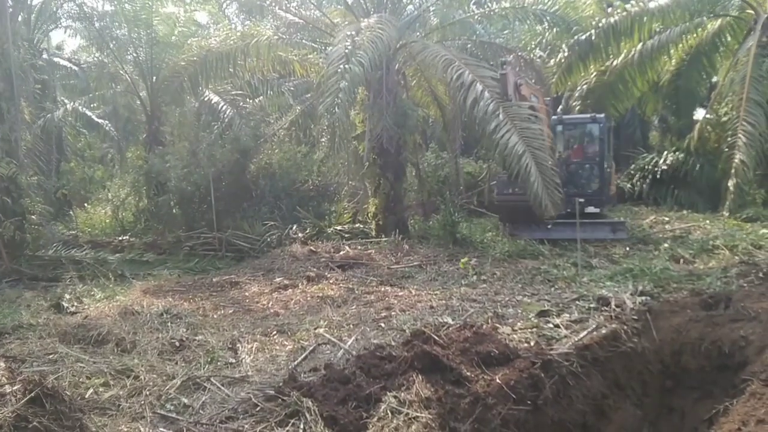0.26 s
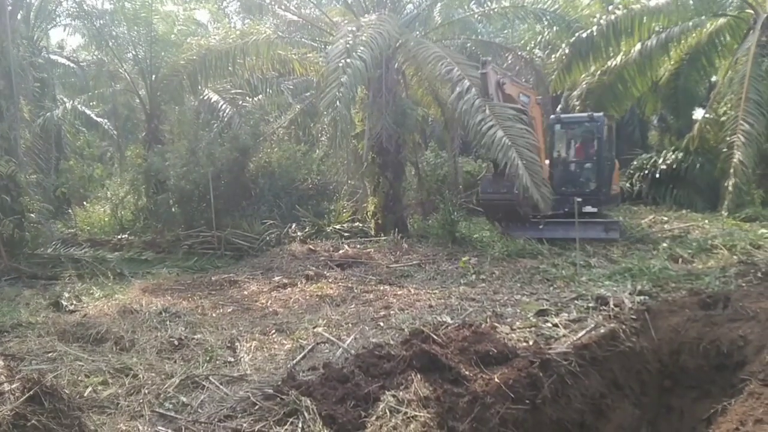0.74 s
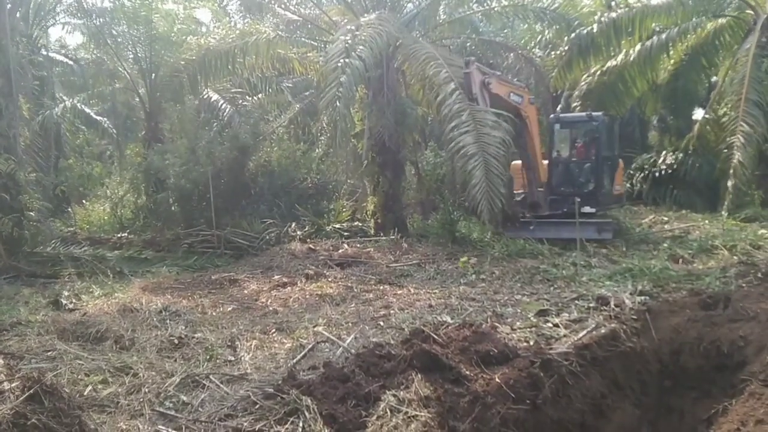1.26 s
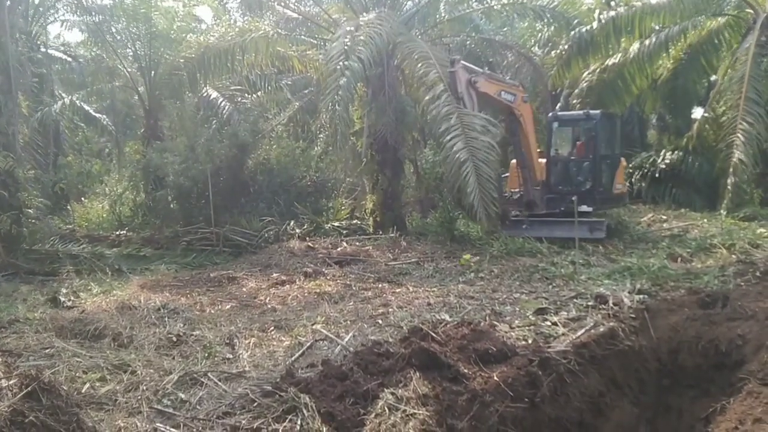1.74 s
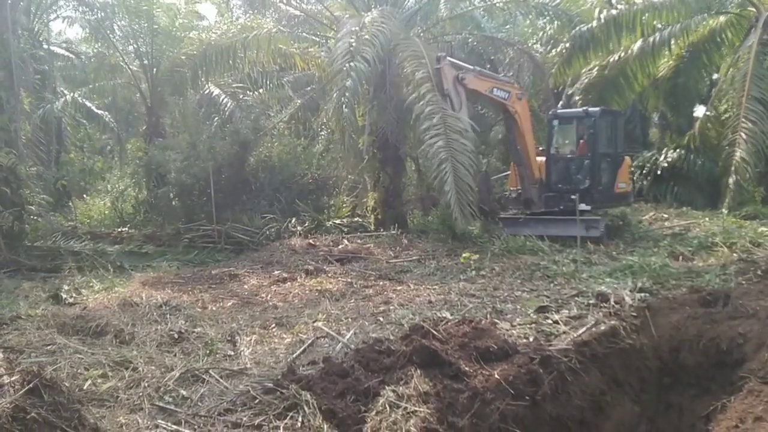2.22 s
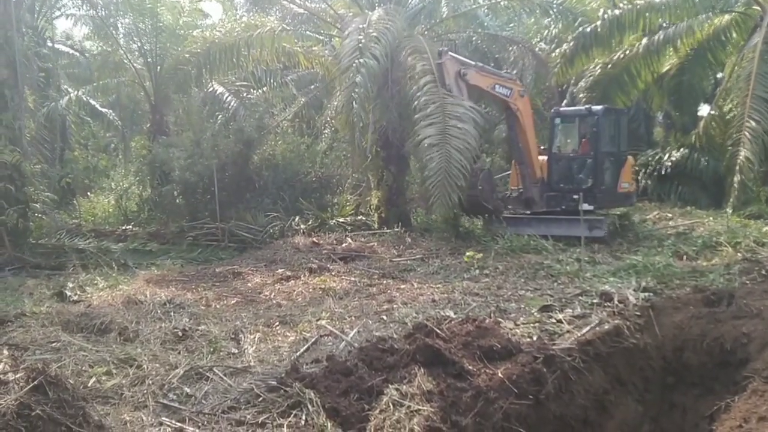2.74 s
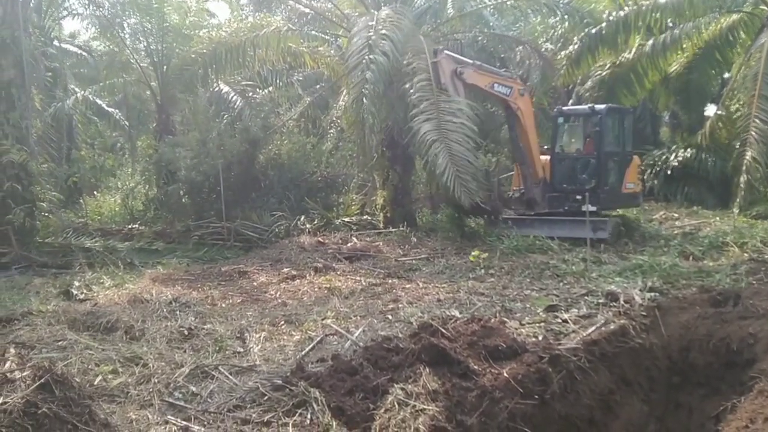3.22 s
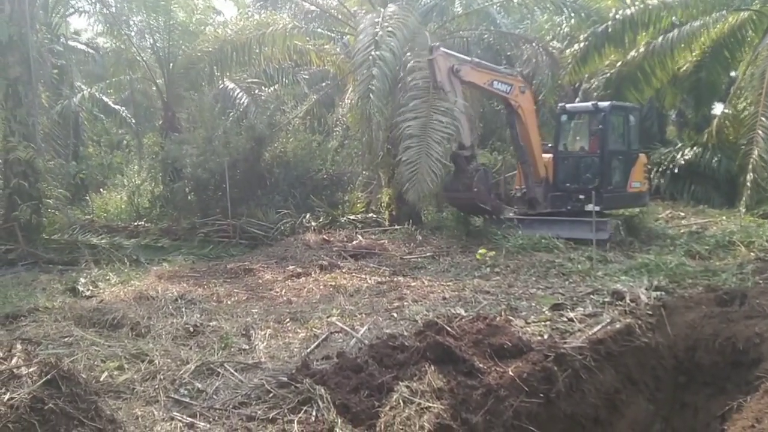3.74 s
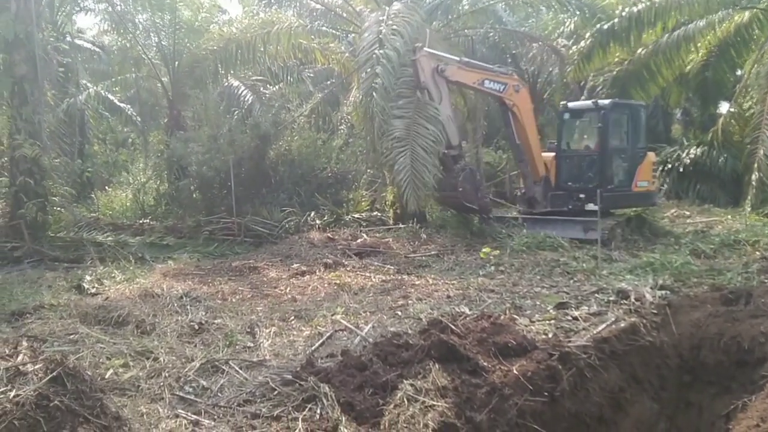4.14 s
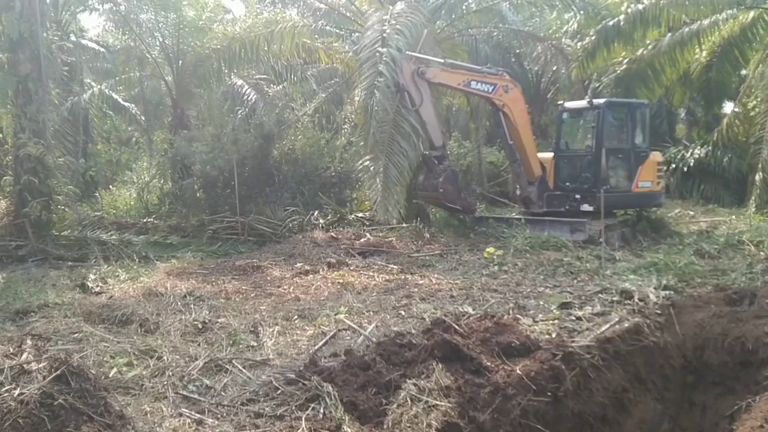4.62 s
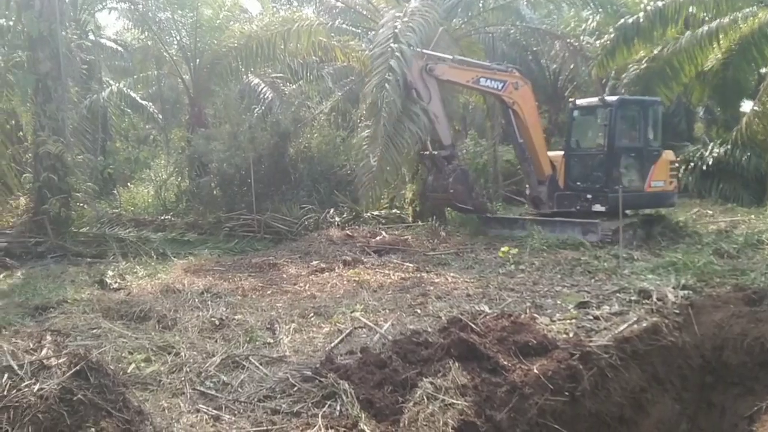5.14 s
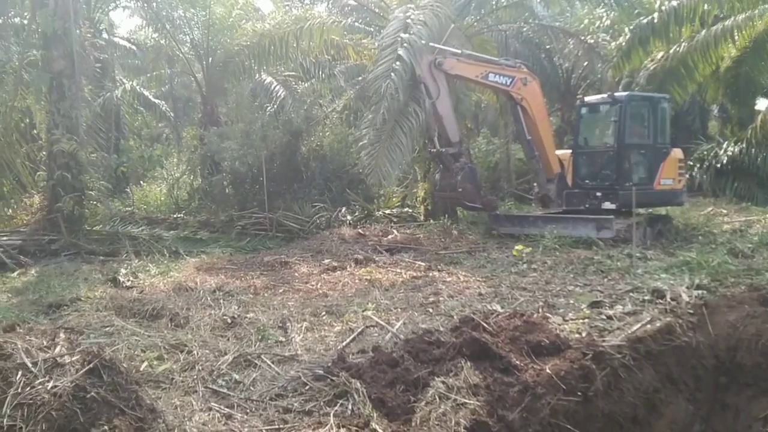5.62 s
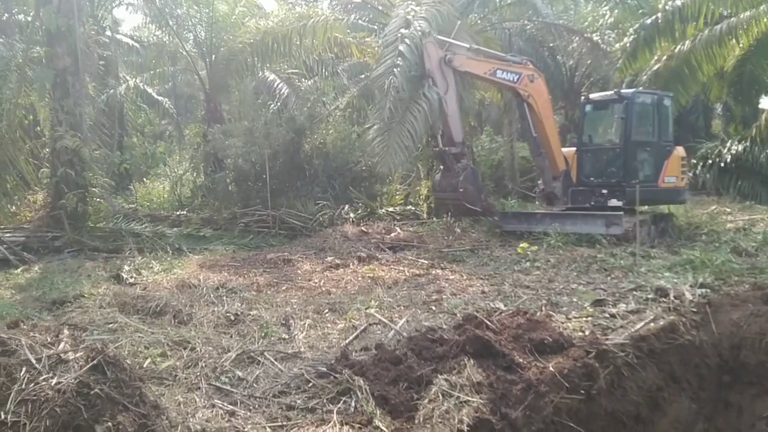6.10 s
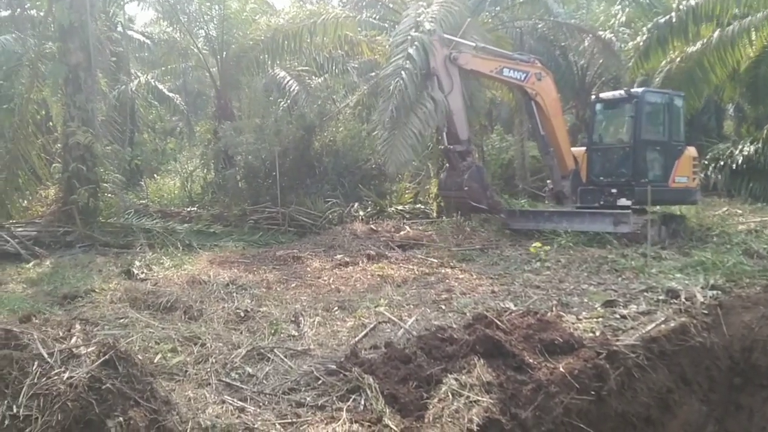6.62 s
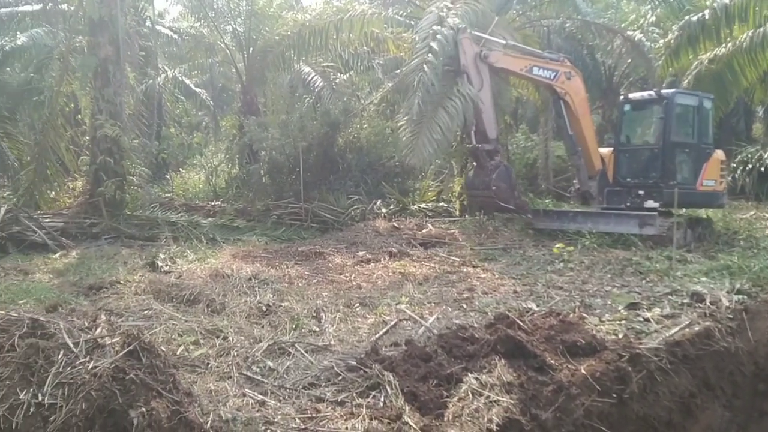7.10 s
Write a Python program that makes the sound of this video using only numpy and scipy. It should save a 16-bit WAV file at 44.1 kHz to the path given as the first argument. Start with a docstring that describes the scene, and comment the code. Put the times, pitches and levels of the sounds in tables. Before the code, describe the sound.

A small diesel excavator hums faintly at a distance outdoors, its steel knocking irregularly, dry fronds snapping, then a burst of hard clanks and grinding soil.

```python
"""Small excavator in a palm grove

A small diesel excavator works some way off. Its exhaust is a hum of sine orders of the firing rate; its
whirr and hiss are noise flickering in fixed resonances. Noise and sharp pushes ring steel, as the tracks or the
bucket knock and the bucket grinds through soil, and ring dry fronds as they snap. Leaves rustle as band noise,
gliding sines squeak and thump near the end, and a low rumble and faint wide noise fill the air. A noise
suppressor and a low-pass follow.
"""
import sys
import numpy as np
from scipy import signal
from scipy.fft import rfft, irfft
from scipy.io import wavfile
from scipy.ndimage import uniform_filter1d

SR = 44100
rng = np.random.default_rng(int(sys.argv[2]) if len(sys.argv) > 2 else 0)


def unload_wav(signal):
    """Save mono or channel-first audio to the path in sys.argv[1] as 16-bit WAV at rate SR, clipped to [-1, 1]."""
    wavfile.write(
        sys.argv[1],
        SR,
        np.round(np.clip(np.atleast_2d(signal).T, -1, 1) * 32767).astype(np.int16),
    )


N = 324576

# Exhaust level over time: time_s, firing_tone_db, octave_db
EXHAUST = [(0.0, -61, -74), (1.52, -60, -69), (3.2, -60.5, -70), (5.06, -57.5, -59.5), (6.39, -59.5, -65),
           (6.5, -70, -75), (7.03, -65, -94), (7.32, -62, -69), (7.36, -64, -91)]
# Firing rate over time: time_s, firing_rate_hz
FIRING_RATE = [(0, 64), (1.4, 63.8), (1.9, 64.1), (2.3, 64.7), (3.2, 65.2), (3.7, 64.2), (4.6, 64.7),
               (6.3, 64.7), (6.6, 67.5), (7, 67.5), (7.36, 65.5)]
# Further exhaust orders: multiple_of_firing_rate, level_db (re firing tone)
EXHAUST_ORDERS = [(0.496, -17), (1.502, -33), (2.502, -15.5), (4.251, -6.5), (4.5, -7.5)]

# Knocks of steel, of the tracks or the bucket, nominal drive levels:
# start_s, boom_db, clang_db, rasp_db, ring_db, t60_s
KNOCKS = [(0.008, -49.5, -46.5, -57, -65, 0.35), (0.46, -63, -49, -60, -51, 0.25),
          (0.532, -32.5, -77, -75, -78, 0.052), (1.789, -42, -80, -78, -90, 0.16),
          (2.02, -60, -39, -65, -72, 0.3), (2.05, -32, -39, -42, -48, 0.15),
          (2.078, -33.5, -35, -36.5, -48.5, 0.23), (2.111, -31, -41.5, -46, -49.5, 0.24),
          (2.18, -37, -35, -42, -41, 0.13), (2.191, -34, -42, -42.5, -46, 0.48),
          (2.413, -31, -38, -46.5, -49, 0.15), (2.466, -41.5, -43, -48, -73, 0.38),
          (2.535, -61, -69, -46, -47, 0.12), (2.564, -61, -68, -51, -46.5, 0.19),
          (2.707, -40, -64, -53, -71, 0.45), (2.746, -40.5, -49.5, -54, -75, 0.25),
          (2.767, -63, -52, -41, -60, 0.2), (2.853, -63, -43, -53, -49, 0.41),
          (2.948, -34, -43, -51.5, -50, 0.35), (3.217, -38.5, -43, -61, -74, 0.15),
          (3.432, -41.5, -48, -49, -48.5, 0.58), (3.591, -33.5, -60, -50.5, -53.5, 0.38),
          (3.692, -45.5, -37, -44, -57, 0.13), (3.775, -36.5, -38.5, -68, -68, 0.14),
          (3.914, -38.5, -65, -51, -50, 0.44), (4.168, -35, -46, -49, -49.5, 0.31),
          (4.462, -41, -57, -54.5, -69, 0.61), (4.599, -33, -57, -49, -68, 0.083),
          (4.704, -38.5, -54, -78, -75, 0.45), (4.793, -38, -48, -51, -52, 0.33),
          (4.951, -34.5, -78, -62, -69, 0.3), (5.022, -42.5, -47, -59, -71, 0.69),
          (5.079, -66, -60, -51.5, -46, 0.19), (5.202, -38.5, -55, -62, -62, 0.84),
          (5.306, -41, -44, -59, -56, 0.68), (5.379, -27.5, -43, -63, -64, 0.093),
          (5.429, -47, -44, -33, -38.5, 0.18), (5.512, -28.5, -24, -34, -38, 0.29),
          (5.633, -30.5, -48, -60, -66, 0.3), (5.744, -36, -31, -35, -48, 0.35),
          (5.762, -45, -26, -36, -36.5, 0.18), (5.78, -23.5, -51, -44, -52, 0.071),
          (5.81, -44, -51, -48, -36, 0.13), (5.88, -27.5, -22.5, -32, -40, 0.27),
          (5.899, -49, -29, -30.5, -34, 0.24), (5.973, -29, -33, -50, -48, 0.22),
          (6.002, -37, -28, -33.5, -33.5, 0.071), (6.042, -38, -39, -51, -46.5, 0.3),
          (6.14, -26, -27.5, -46, -47, 0.15), (6.172, -27.5, -33, -44, -60, 0.11),
          (6.227, -30.5, -71, -70, -72, 0.22), (6.261, -45, -37, -48, -50.5, 0.13),
          (6.381, -74, -35, -40, -45, 0.26), (6.459, -38, -49, -43, -70, 0.21),
          (6.496, -27.5, -35, -48, -68, 0.4), (6.547, -32.5, -38.5, -48, -48.5, 0.11),
          (6.745, -34, -40, -59, -68, 0.21), (6.855, -39, -58, -59, -65, 0.14),
          (7.09, -35.5, -64, -60, -72, 0.13)]
# Bucket dragged through soil, nominal drive levels: time_s, boom_db, clang_db, rasp_db, ring_db, scrape_db
GRIND = [(5.3, -34.5, -48, -53, -57, -66), (5.612, -40, -41, -59, -50, -83),
         (5.73, -41, -44.5, -52, -83, -74), (5.77, -40, -39, -43, -45, -50),
         (5.87, -36.5, -32.5, -38.5, -42, -46.5), (5.966, -39, -36, -39, -41.5, -44.5),
         (6.07, -38, -40.5, -43.5, -46.5, -57), (6.166, -48.5, -44.5, -55.5, -53, -75),
         (6.416, -45, -48, -54, -56, -80), (6.676, -45, -54.5, -60.5, -77, -81),
         (6.866, -51.5, -55.5, -78, -84, -77), (6.96, -61, -66, -70, -78, -80),
         (7.1, -46, -63, -72, -80, -80)]
# Resonances of the steel: pitch_hz, width_hz, level_db
STEEL_MODES = [(279, 40.4, -20), (349.98, 30, -4.5), (431.3, 67, 4), (398.6, 40, 17.5), (448.6, 59, 13),
               (810, 355, -13), (857, 267, -1), (843.5, 89, 1.5), (1018, 48, 0.5), (1115, 26, -4.5),
               (1238, 38, -13.5), (1320, 8.2, 3), (1301, 203, -4), (1693, 46, -1), (1750, 31, -4),
               (2033, 166, 4.5), (2150, 8.2, 6.5), (2290, 160, -9.5), (2736, 333, -4), (2944, 234, -0.5),
               (3356, 87, -9), (3600, 610, -17.5), (3970, 140, -18.5), (4910, 600, -12.5),
               (6540, 1550, -22)]
# Borders between the steel's bands (deep, boom, clang, rasp, ring, scrape, crack): border_hz
STEEL_EDGES = [350, 600, 1550, 2450, 3200, 4500]
# Single sharp push that starts a knock, for boom, clang, rasp and ring: level_db (re peak of the knock)
STRIKE_DB = [24, 17, 13, 13]

# Resonances of the machine: pitch_hz, width_hz, level_db
MACHINE_MODES = [(805, 83, 4.5), (1120, 40, -11), (1291, 64, 6.5), (1468, 18, 1.5), (1898, 58, -10.5),
                 (2016, 35, -2), (2190, 60, -5.5), (2331, 54, -3), (2715, 64, -9.5), (2809, 35, -8),
                 (2910, 48, -10.5), (3563, 65, -8.5), (4058, 69, -6), (4620, 1050, -8), (5000, 590, -7.5),
                 (5834, 620, -7), (6440, 660, -1.5), (6900, 350, -3.5), (7490, 700, -2), (8280, 550, -9.5)]
# Borders between the machine's bands (drone, buzz, whirr, whine, lower hiss, upper hiss): border_hz
MACHINE_EDGES = [950, 1600, 2450, 3200, 5450]
# Low drone: time_s, level_db
DRONE = [(0.0, -71), (0.33, -70), (0.7, -60), (1.95, -54), (2.97, -60), (4.45, -52), (5.23, -55),
         (5.86, -49.5), (7.09, -57.5), (7.36, -59.5)]
# Whirr and whine, one list before and one after the dig: time_s, whirr_db, whine_db
WHIRR = [
    [(0.0, -60, -59), (0.48, -61.5, -61), (0.77, -53.5, -55), (1.21, -63.5, -57.5), (1.41, -55.5, -55.5),
     (1.83, -66, -62.5), (2.26, -60.5, -58.5), (3.11, -60, -63.5), (3.95, -68, -52.5), (4.29, -57.5, -58.5),
     (4.93, -74, -59.5), (5.35, -54.5, -65)],
    [(6.2, -51.5, -59), (6.498, -72, -67.5), (6.66, -75, -57.5), (6.72, -76, -86), (6.934, -71, -67),
     (7.134, -80, -93), (7.22, -62, -80), (7.24, -62, -56), (7.36, -66, -78)],
]
# Hiss: time_s, upper_hiss_db, lower_hiss_db
HISS = [(0.1, -49.5, -53), (0.22, -52, -55.5), (1.15, -51, -54), (2.02, -51.5, -56), (2.06, -55.5, -59),
        (2.46, -49, -53), (3.38, -52.5, -56), (3.88, -50, -53.5), (4.69, -51, -56.5), (5.15, -50, -54),
        (5.72, -53.5, -55), (5.96, -48, -52.5), (6.15, -56, -55), (6.27, -55, -55), (6.45, -56, -58.5),
        (6.49, -56.5, -54.5), (6.62, -53, -57.5), (6.72, -59.5, -59.5), (6.77, -71, -68), (6.865, -72, -74),
        (6.88, -72, -54), (6.95, -63, -64), (7.14, -67, -64), (7.15, -55, -56.5), (7.21, -56.5, -58),
        (7.29, -53.5, -57), (7.31, -52.5, -54), (7.36, -51.5, -56)]
# Narrow gaps in the steady noise: pitch_hz, width_hz, depth_db
GAPS = [(610, 60, -8), (2490, 80, -4), (3170, 110, -5), (5390, 130, -8), (6150, 150, -5), (9250, 200, -4)]

# Dry fronds snapping, drive levels: start_s, peak_db, upper_resonances_db (re lower)
SNAPS = [(1.099, -39.5, -39), (2.901, -38.5, -3), (3.071, -66.5, 23.5), (3.1373, -56.5, 14),
         (3.177, -60, 19.5), (3.491, -34, 0), (3.6883, -43, -5), (3.7243, -35.5, -3), (3.8408, -43, 5),
         (3.845, -37, -1), (3.877, -41, 0), (3.892, -41, -4), (3.918, -44, -9), (3.931, -29.5, -2),
         (3.967, -39, 0), (3.973, -39, -10), (3.98, -42.5, 6), (3.99, -38.5, 3.5), (4.004, -46, 2),
         (4.13, -38, -14), (4.522, -46.5, 9.5), (4.7114, -42, 5), (6.48, -60.5, 16), (7.23, -48, -15)]
# Resonances of a frond, the first three being the lower ones: pitch_hz, width_hz, level_db
FROND_MODES = [(2795, 270, 4.5), (3702, 330, 7), (5270, 710, -8), (6850, 930, 2), (8900, 2600, -14)]
# Fronds brushed by the arm: time_s, level_db
RUSTLE = [(2.31, -78), (2.35, -58.5), (2.6, -75), (2.92, -58), (3.02, -77)]
# Short gliding tones near the end, squeaks and low thumps: start_s, length_s, from_hz, to_hz, level_db
GLIDES = [(6.956, 0.016, 1107, 1020, -49), (6.985, 0.036, 870, 785, -53.5), (7.088, 0.026, 573, 490, -47.5),
          (7.095, 0.045, 773, 1047, -48.5), (7.096, 0.036, 2130, 2110, -59),
          (7.114, 0.035, 285, 265, -51.5), (7.176, 0.03, 282, 265, -52), (7.152, 0.14, 1230, 1310, -57),
          (7.328, 0.056, 2300, 2070, -54)]
# Spectrum of the air noise: pitch_hz, density_db (per Hz, relative)
AIR_SPECTRUM = [(20, -36), (45, -26.5), (110, -12), (170, -18.5), (230, -19), (330, -9.5), (600, -6.5),
                (1500, -14), (3200, -15), (4100, -20.5), (4500, -26), (9000, -52), (10000, -58),
                (15600, -46)]

BUZZ_DB = -5.5  # re drone
SCRAPE_DB, CRACK_DB = -12, -9  # re the ring column of a knock
TICK_DB, TICK_S = -3, 0.008  # first contact of a knock, re clang and higher bands; its decay constant
SHOVE_S, SOFTER = 0.36, 0.13  # knocks with a longer t60 start more slowly; added share of rise at twice that t60
SPOT_DB, SPOTS_PER_S = 2.2, 5  # the place that is struck keeps moving, so each plate rings more or less
RUMBLE_DB = 1.5  # the low plates rattle in lumps while they ring
NARROW_HZ = 150  # narrow machine resonances waver in speed by a share and break into short grains:
WAVER, WAVERS_PER_S = .009, 9
CHIRP_DB, CHIRPS_PER_S = 3, 24
SIZZLE_HZ, SIZZLE_WIDTH_HZ, SIZZLE_DB = 7200, 170, -66  # a thin hiss that never stops
SNAP_RISE_S, SNAP_T60_S = .0005, .022
CLICK_DB = 12  # the single break that starts a snap, re its crackle
GLIDE_ROUGH = 0.02  # share by which the pitch trembles
AIR_DB = -52  # mean level below FIZZ_HZ
FIZZ_HZ, FIZZ_FOLLOWS = 8800, .4  # air above this pitch follows this share of the upper hiss's changes
EDGE_HZ = 15550  # upper band limit


def amp(db):
    """Decibel law: 20 dB is a factor of ten in amplitude."""
    return 10 ** (np.asarray(db) / 20)


def evened(x):
    """Power normalization: scales to rms 1."""
    return x / np.sqrt(np.mean(x ** 2) + 1e-20)


def curves(rows):
    """Linear interpolation: each column after the time becomes one value a sample."""
    time_s, *columns = np.transpose(rows)
    return np.array([np.interp(np.arange(N) / SR, time_s, c) for c in columns])


def flicker(per_s):
    """Band-limited random modulation: rms 1, wavering about per_s times a second."""
    steps = rng.standard_normal(N // 256 + 1)  # one step every 256 samples
    band = np.clip(np.array([.3, 1]) * per_s * 512 / SR, .001, .9)
    b, a = signal.butter(1, band, "bandpass")
    steps = evened(signal.filtfilt(b, a, steps))
    return np.interp(np.arange(N) / 256, np.arange(len(steps)), steps)


def ring(x, modes):
    """Damped resonance: convolves with steep modes (each applied twice); white noise keeps its level."""
    longest_s = 3 / min(width for _, width, _ in modes)
    t = np.arange(min(3072, int(longest_s * SR))) / SR
    response = 0
    for k, (hz, width, db) in enumerate(modes):
        decay = width ** 2 * t * np.exp(-4.9 * width * t)
        response = response + (-1) ** k * amp(db) * decay * np.sin(2 * np.pi * hz * t)
    return signal.oaconvolve(x, response / np.linalg.norm(response))[:N]


def grouped(modes, edges_hz):
    """Band division: splits a table of resonances at the given frequencies."""
    return [[m for m in modes if np.searchsorted(edges_hz, m[0]) == k] for k in range(len(edges_hz) + 1)]


def engine():
    """Harmonic synthesis: exhaust pulses reach this far as a few clean orders of the firing rate."""
    firing_db, octave_db = curves(EXHAUST)
    phase = 2 * np.pi * np.cumsum(curves(FIRING_RATE)[0]) / SR
    out = amp(firing_db + 0.28 * flicker(10)) * np.sin(phase)
    out += amp(octave_db + 2.2 * flicker(14)) * np.sin(2 * phase)
    for multiple, db in EXHAUST_ORDERS:
        level = amp(firing_db + db + 2.0 * flicker(4.7))
        out += level * np.sin(multiple * phase + 2 * np.pi * rng.random())
    return np.sqrt(2) * out


def grinding():
    """Frictional excitation: lumpy drive levels of soil for the seven bands of the steel."""
    drive = np.zeros((7, N))
    boom_db, *upper_db = curves(GRIND)
    fade_s = [GRIND[0][0], GRIND[1][0], GRIND[-2][0], GRIND[-1][0]]
    inside = np.interp(np.arange(N) / SR, fade_s, [0, 1, 1, 0])
    grit = evened(amp(3.4 * np.tanh(flicker(31))))  # stones pass in lumps
    drive[:6] = inside * grit * amp([boom_db - 3.0, boom_db - 2.5, *upper_db])
    drive[3:6] *= evened(amp(2.2 * flicker(82)))  # fine grit scratches
    return drive


def plates(x, modes):
    """Modal superposition: rings each resonance by itself, with a share that keeps changing."""
    share = np.array([amp(db) * np.sqrt(width) for _, width, db in modes])
    share /= np.linalg.norm(share)
    out = 0
    for k, (hz, width, _) in enumerate(modes):
        spot = evened(amp(SPOT_DB * flicker(SPOTS_PER_S)))
        out = out + (-1) ** k * share[k] * spot * ring(x, [(hz, width, 0)])
    return out


def steel():
    """Impact and frictional excitation: knocks and grinding soil drive the same resonances."""
    drive, strikes = grinding(), np.zeros((7, N))
    t = np.arange(SR // 3) / SR
    shorter = np.array([[1.1], [1.01], [.8], [.6], [.6], [.4], [.3]])  # the treble dies first
    rise_s = np.array([[.005], [.004], [.002], [.0012], [.001], [.001], [.0008]])  # and starts first
    for s, boom, clang, rasp, bright, t60 in KNOCKS:
        at = max(round(s * SR) - 40, 0)
        deep = boom - 3.5 + 1.65 * (boom + 30)  # only hard knocks shake the largest plates
        levels_db = np.array([deep - 9, boom - 9, clang - 3, rasp - 3, bright - 3,
                              bright + SCRAPE_DB, bright + CRACK_DB])
        fade_db = -60 * (t / (max(t60, .01) * shorter)) ** 1.213
        slower = 1 + SOFTER * max(t60 / SHOVE_S - 1, 0)
        knock = amp(levels_db[:, None] + fade_db) * np.minimum(t / (rise_s * slower), 1)
        strikes[1:5, at + 40] += amp(STRIKE_DB) * knock[1:5].max(axis=1)
        knock[2:] *= 1 + amp(TICK_DB) * np.exp(-t / TICK_S)
        part = drive[:, at:at + len(t)]
        part[:] = np.hypot(part, knock[:, :N - at])  # powers add
    drive[:2] *= evened(amp(RUMBLE_DB * np.tanh(flicker(39))))
    bands = zip(drive, strikes, grouped(STEEL_MODES, STEEL_EDGES))
    return sum(plates(level * rng.standard_normal(N) + push, modes) for level, push, modes in bands)


def wavering(x, width_hz):
    """Frequency modulation by varying delay: a narrow band plays at a drifting speed and warbles."""
    if width_hz > NARROW_HZ:
        return x
    at = np.arange(N)
    return np.interp(at + np.cumsum(WAVER * flicker(WAVERS_PER_S)), at, x)


def machine():
    """Noise-excited resonance: rattle fills fixed resonances, and each swells and fades by itself."""
    drone_db = curves(DRONE)[0]
    upper_hiss_db, lower_hiss_db = curves(HISS)
    whirr_db, whine_db = curves(WHIRR[0] + WHIRR[1])
    levels_db = [drone_db, drone_db + BUZZ_DB, whirr_db, whine_db, lower_hiss_db, upper_hiss_db]
    depths_db = [1.1, 4.3, 8, 9, 0.79, 0.8]
    rattle = amp(1.3 * flicker(70))  # small parts chatter in all bands at once
    out = 0
    for level_db, modes, depth_db in zip(levels_db, grouped(MACHINE_MODES, MACHINE_EDGES), depths_db):
        band = 0
        for hz, width, db in modes:
            swell_db = db + depth_db * np.tanh(1.63 * flicker(6.94))
            if width < NARROW_HZ:
                swell_db = swell_db + CHIRP_DB * flicker(CHIRPS_PER_S)
            tone = wavering(ring(rattle * rng.standard_normal(N), [(hz, width, 0)]), width)
            band = band + amp(swell_db) * np.sqrt(width) * tone
        out = out + amp(level_db) * evened(band)
    sizzle = ring(rng.standard_normal(N), [(SIZZLE_HZ, SIZZLE_WIDTH_HZ, 0)])
    return out + amp(SIZZLE_DB + 5.0 * np.tanh(2.7 * flicker(11))) * sizzle


def fronds():
    """Brittle fracture: short cracks ring the frond, with a faint random crackle around them."""
    drive, clicks = np.zeros((2, 2, N))  # each with a lower and an upper row
    t = np.arange(1200) / SR
    crack = np.minimum(t / SNAP_RISE_S, 1) * amp(-60 * t / SNAP_T60_S)
    for s, db, upper_db in SNAPS:
        at = round(s * SR)
        drive[:, at:at + len(t)] += (amp([[db], [db + upper_db]]) * crack)[:, :N - at]
        clicks[:, at + 20] = amp([db + CLICK_DB, db + upper_db + CLICK_DB])
    small_db = curves(HISS)[0] - 8 + 3.1 * np.minimum(rng.exponential(1, N), 1.8)
    small = amp(small_db) * (rng.random(N) < 90 / SR)  # about 90 a second
    drive += signal.oaconvolve(small, amp(-60 * t / .02))[:N]
    bands = zip(drive, clicks, (FROND_MODES[:3], FROND_MODES[3:]))
    return sum(ring(level * rng.standard_normal(N) + click, modes) for level, click, modes in bands)


def rustle():
    """Band-limited noise: a wide, grainy hiss of leaves dragged aside."""
    sos = signal.butter(5, (3300, 8300), "bandpass", fs=SR, output="sos")
    s = np.arange(N) / SR
    inside = (s > RUSTLE[0][0]) & (s < RUSTLE[-1][0])
    hiss = evened(signal.sosfilt(sos, rng.standard_normal(N)))
    return inside * amp(curves(RUSTLE)[0] + 2 * flicker(60)) * hiss


def glides():
    """Frequency glide: short tones near the end, squeaks and low thumps, slide and tremble in pitch."""
    out = np.zeros(N)
    for s, length_s, from_hz, to_hz, db in GLIDES:
        u = np.linspace(0, 1, round(length_s * SR))
        tremble = evened(uniform_filter1d(rng.standard_normal(8000), size=90))[:len(u)]
        hz = (from_hz + (to_hz - from_hz) * u) * (1 + GLIDE_ROUGH * tremble)
        envelope = amp(db) * np.sqrt(2) * np.sin(np.pi * u)
        tone = envelope * np.sin(2 * np.pi * np.cumsum(hz) / SR)
        part = out[round(s * SR):][:len(u)]
        part += tone[:len(part)]
    return out


def air():
    """Spectral shaping of noise: the low rumble and faint wide noise of the grove."""
    hz, db = np.transpose(AIR_SPECTRUM)
    f = np.fft.rfftfreq(N, 1 / SR)
    shape_db = np.interp(np.log(f + 1), np.log(hz + 1), db)
    spectrum = rfft(rng.standard_normal(N)) * amp(shape_db)
    low, fizz = irfft(spectrum * (f < FIZZ_HZ), N), irfft(spectrum * (f >= FIZZ_HZ), N)
    load_db = uniform_filter1d(curves(EXHAUST)[0], SR // 4)  # the rumble follows the engine
    hiss_db = uniform_filter1d(curves(HISS)[0], SR // 2)
    low_gain = amp(0.18 * (load_db - load_db.mean()))
    fizz_gain = amp(FIZZ_FOLLOWS * (hiss_db - hiss_db.mean()))
    return amp(AIR_DB) / low.std() * (low_gain * low + fizz_gain * fizz)


def gapped(x):
    """Notch filtering: cuts narrow gaps into the steady noise."""
    f = np.fft.rfftfreq(N, 1 / SR)
    cut_db = sum(db * np.exp(-((f - hz) / width) ** 2) for hz, width, db in GAPS)
    return irfft(rfft(x) * amp(cut_db), N)


def scene():
    """Linear superposition: engine, steel, steady noise, fronds, rustle and gliding tones add."""
    steady = gapped(machine() + air())
    return (engine() + steel() + steady + fronds() + rustle() + glides())[None]


def record(dry):
    """Spectral gating: a noise suppressor lowers each band near its quiet level; then the band limit."""
    hz, _, z = signal.stft(dry[0], SR, nperseg=1024, noverlap=768)
    power = uniform_filter1d(abs(z) ** 2, size=3, axis=0)
    power = uniform_filter1d(power, size=11, axis=1)
    quiet = uniform_filter1d(np.percentile(power, 20, axis=1), size=45)[:, None]
    gain = np.maximum(1 - .8 * quiet / (power + 1e-20), amp(-15))
    gain[(hz < 250) | (hz > 10200)] = 1  # left untouched
    clean = signal.istft(z * gain, SR, nperseg=1024, noverlap=768)[1][None, :N]
    lowpass = signal.firwin(1023, EDGE_HZ, window=("kaiser", 9), fs=SR)
    return signal.oaconvolve(clean, lowpass[None], "same")


dry = scene()
out = record(dry)
unload_wav(out)
```